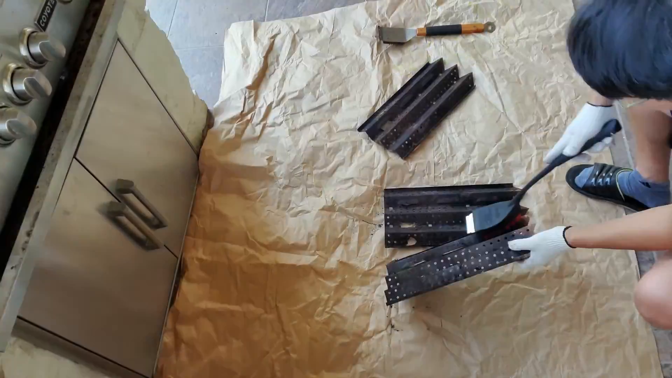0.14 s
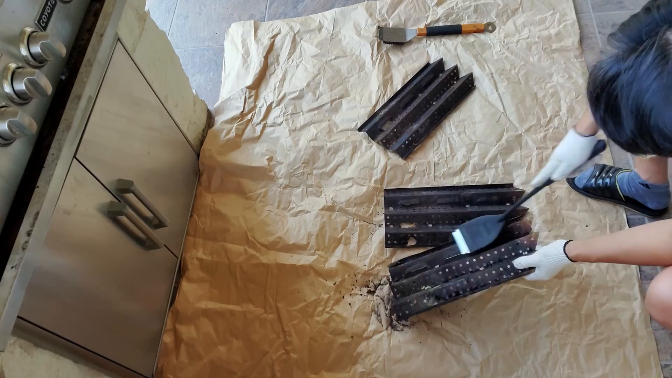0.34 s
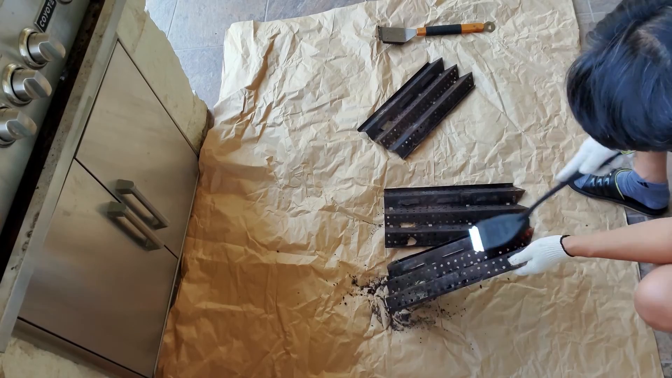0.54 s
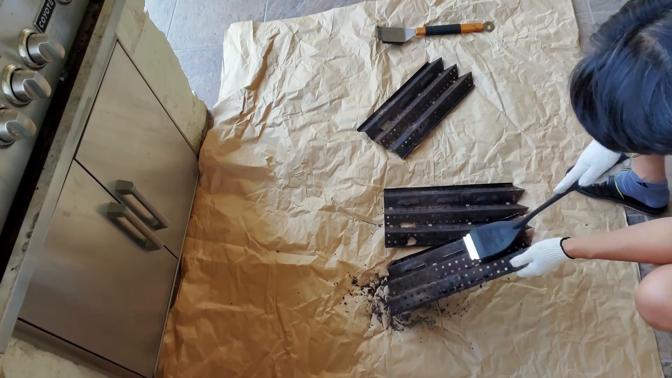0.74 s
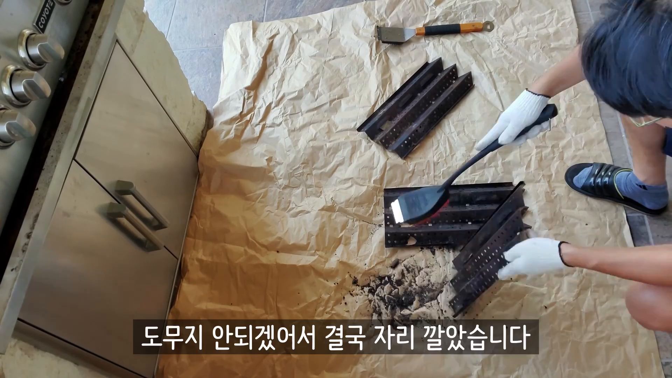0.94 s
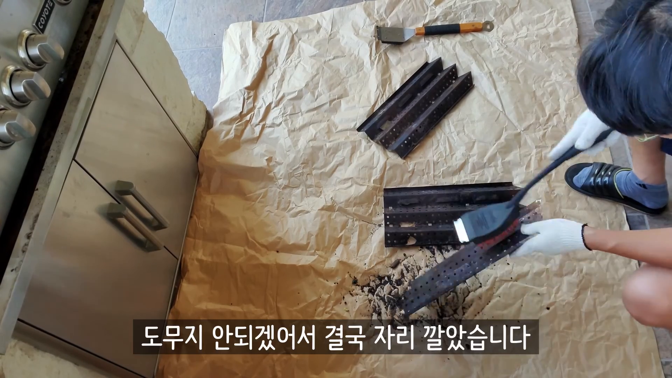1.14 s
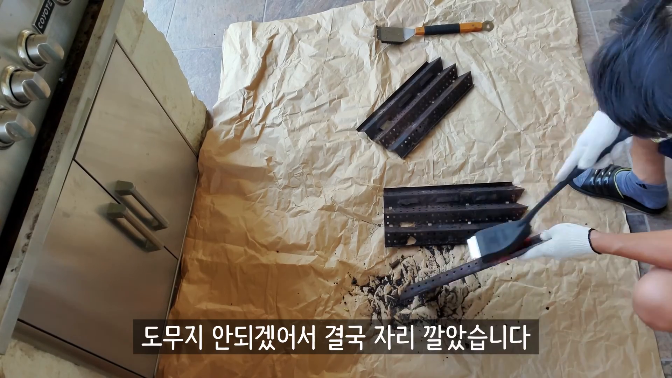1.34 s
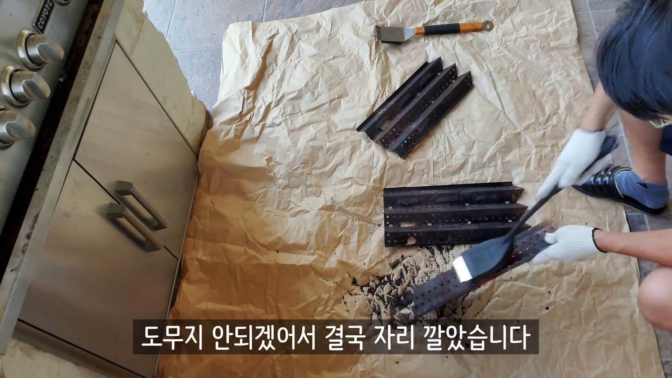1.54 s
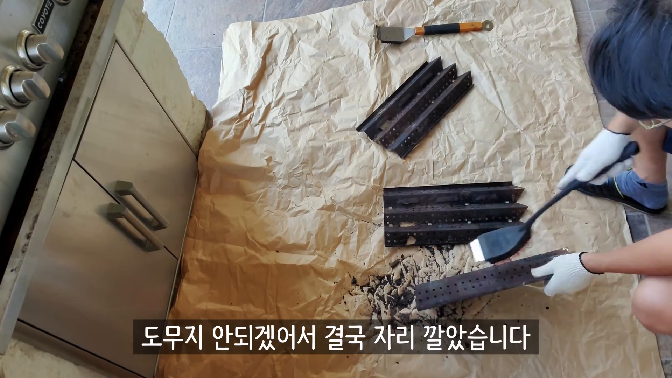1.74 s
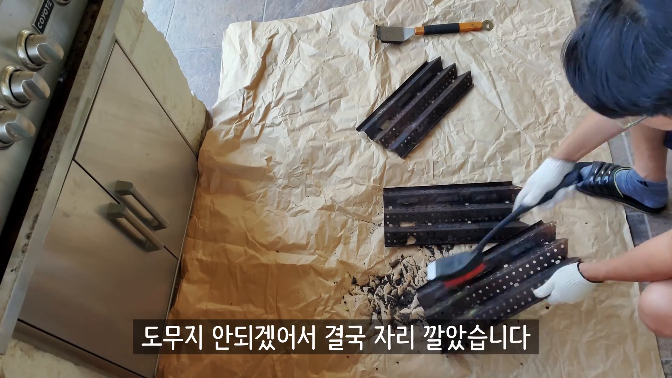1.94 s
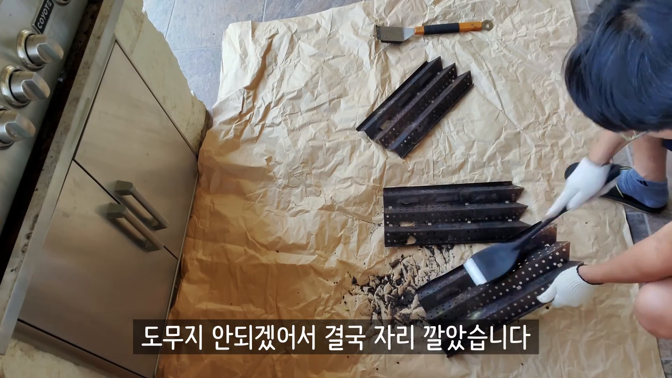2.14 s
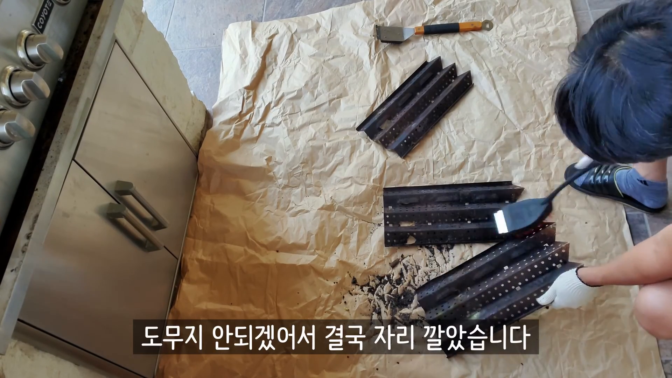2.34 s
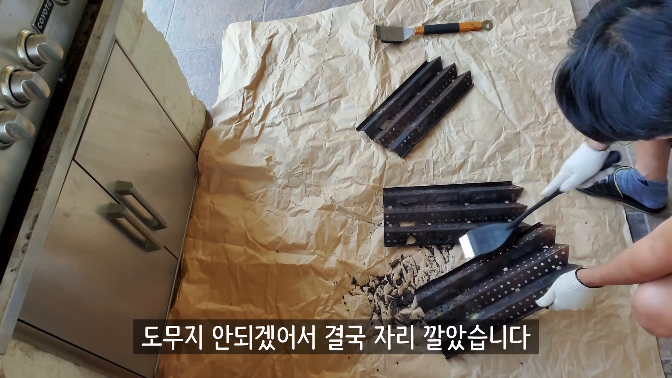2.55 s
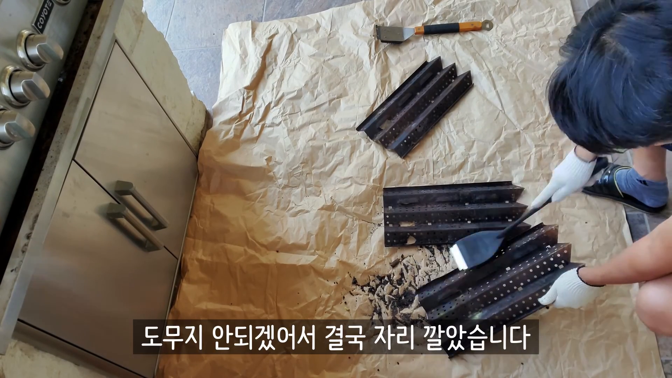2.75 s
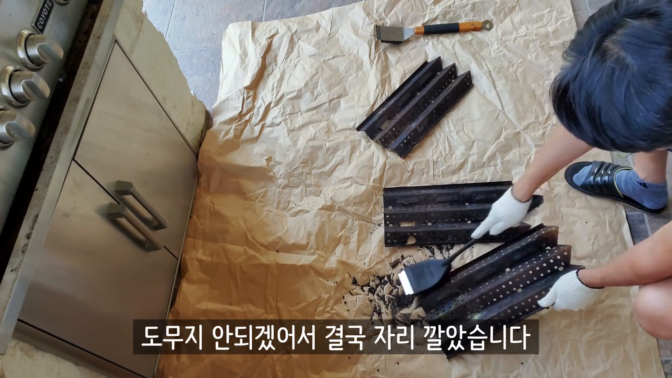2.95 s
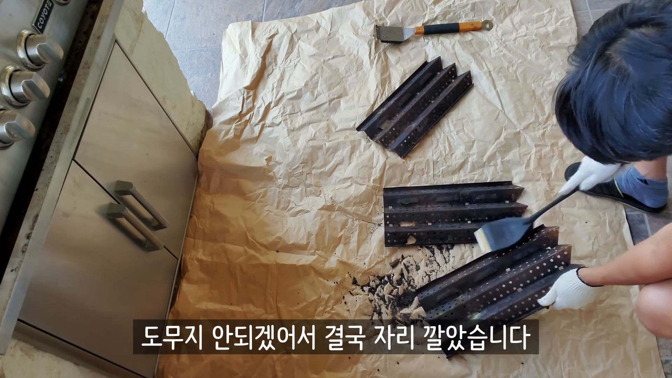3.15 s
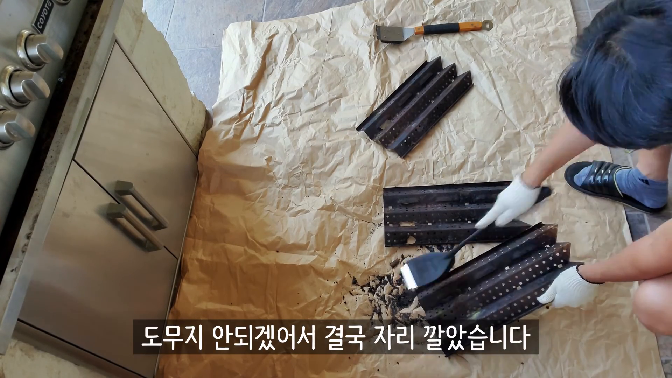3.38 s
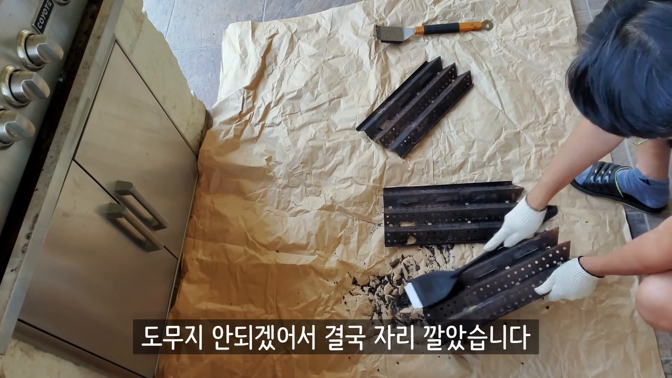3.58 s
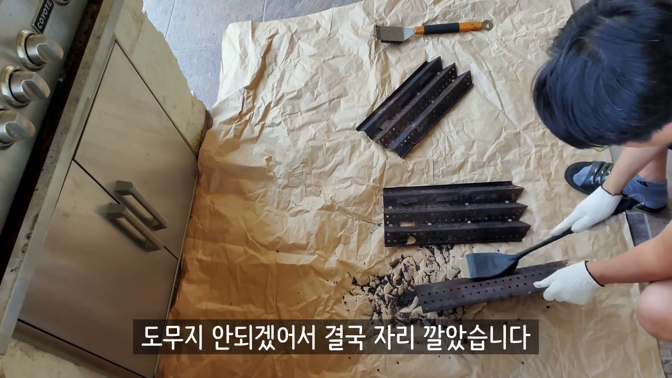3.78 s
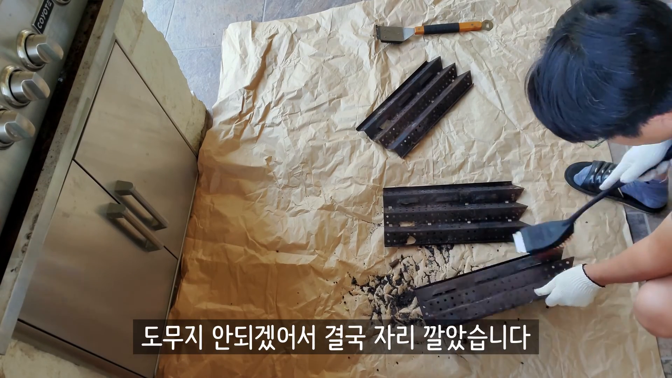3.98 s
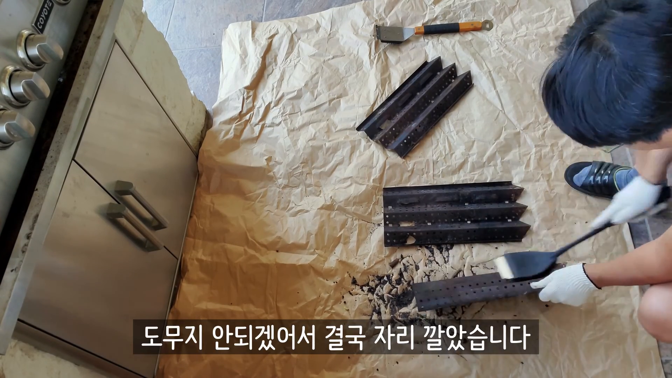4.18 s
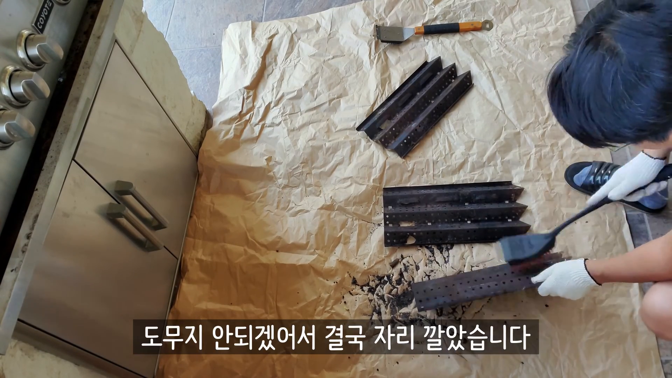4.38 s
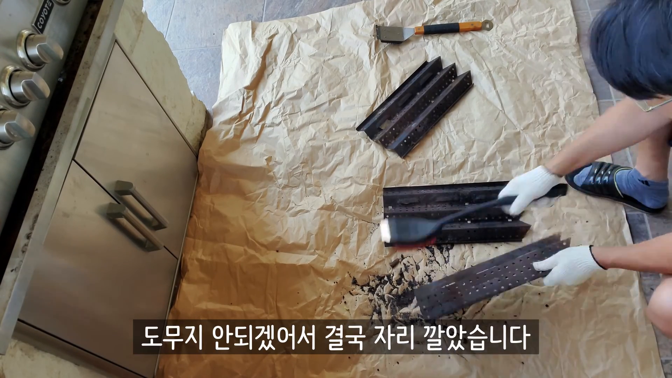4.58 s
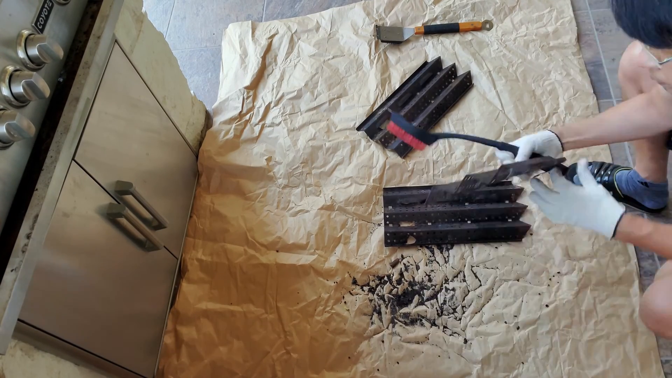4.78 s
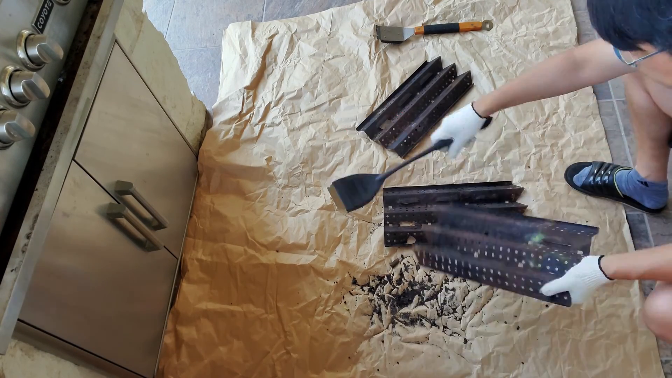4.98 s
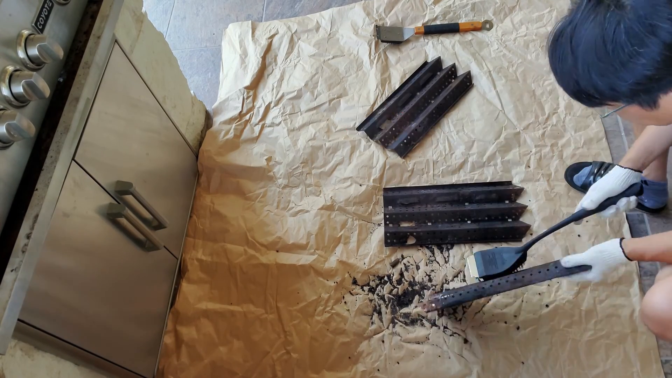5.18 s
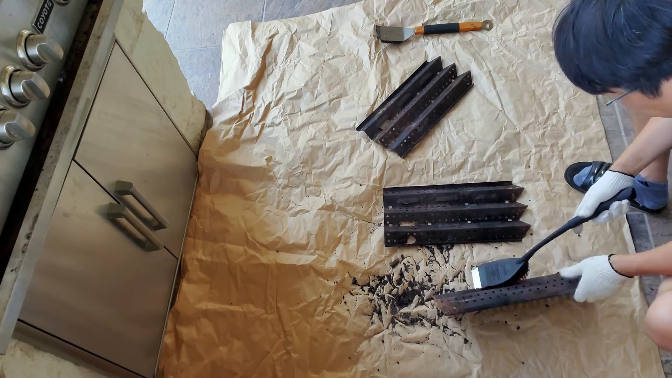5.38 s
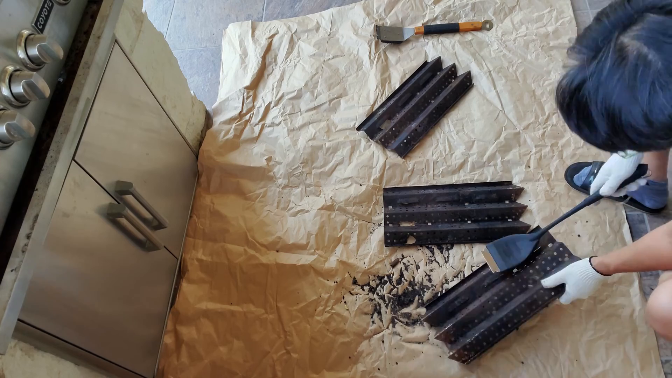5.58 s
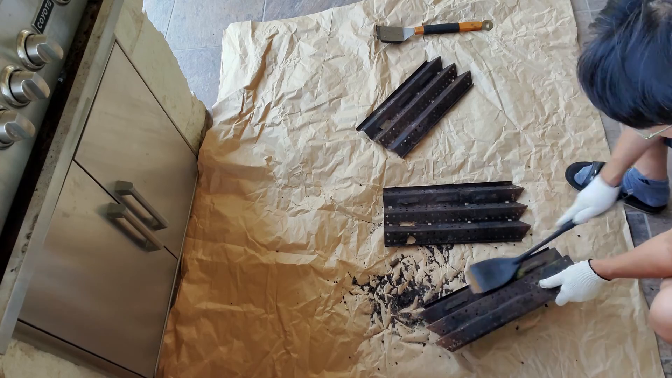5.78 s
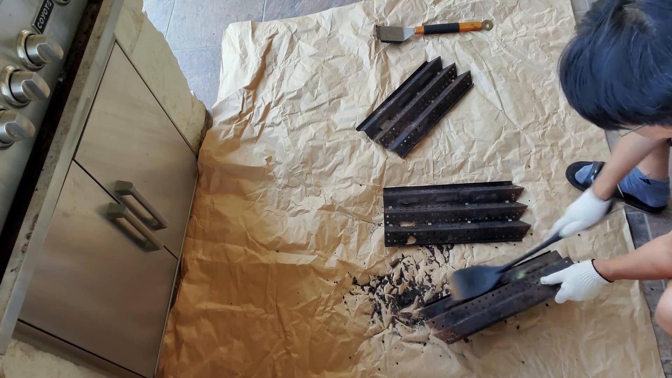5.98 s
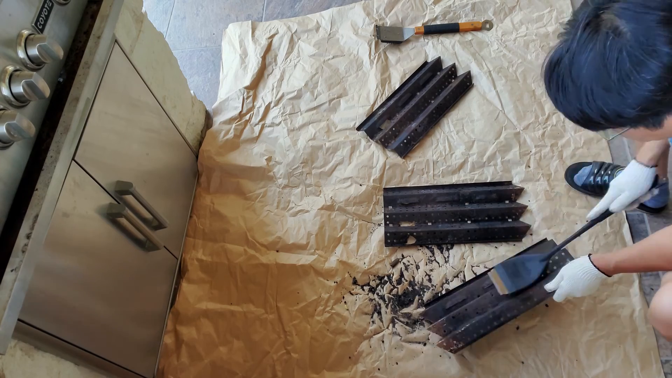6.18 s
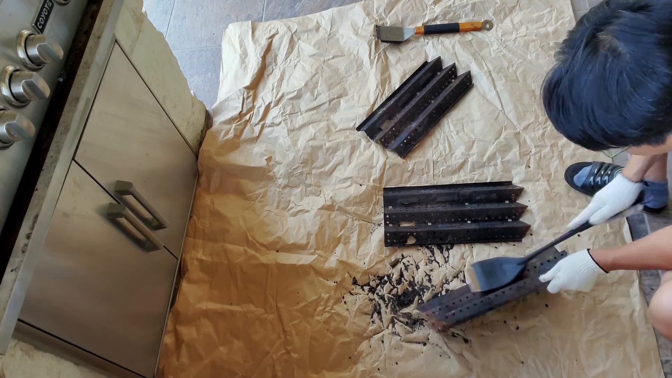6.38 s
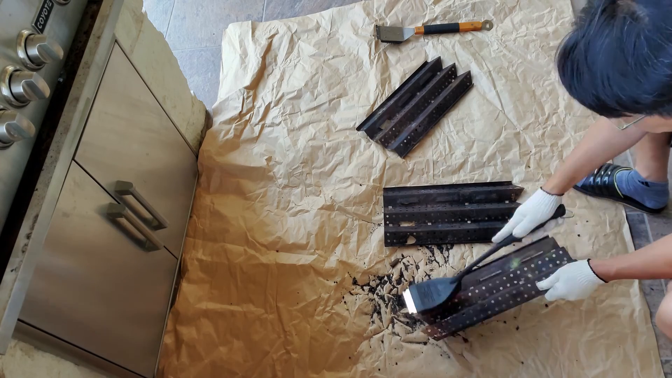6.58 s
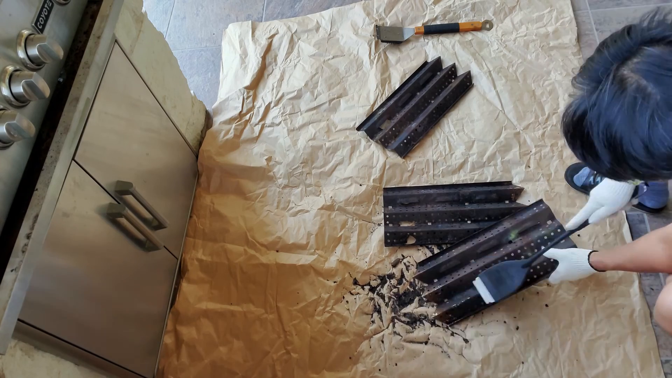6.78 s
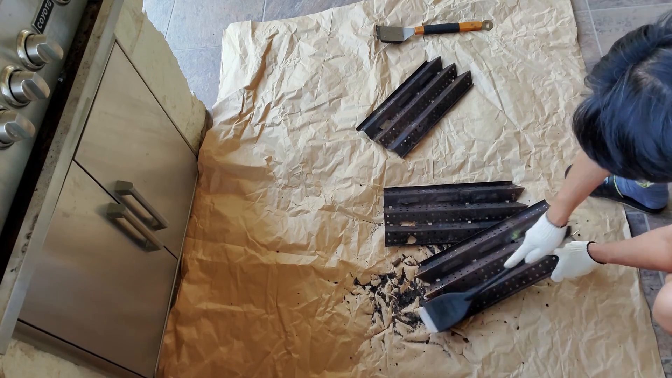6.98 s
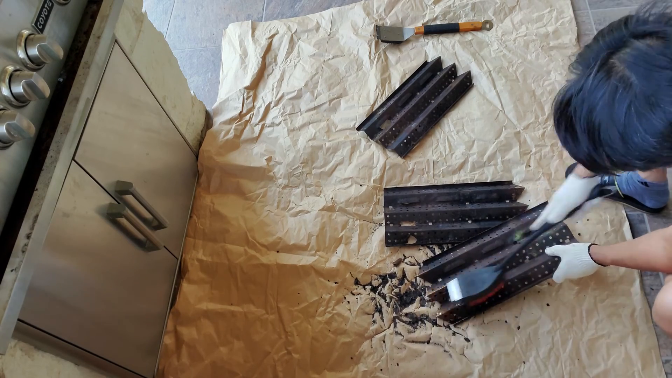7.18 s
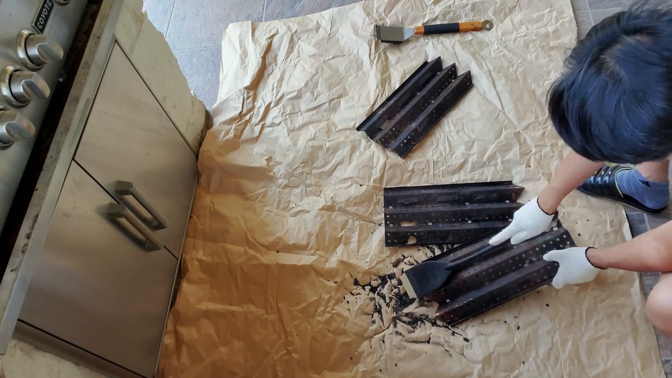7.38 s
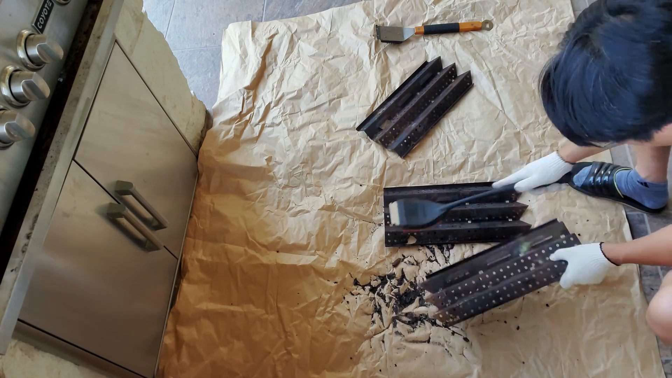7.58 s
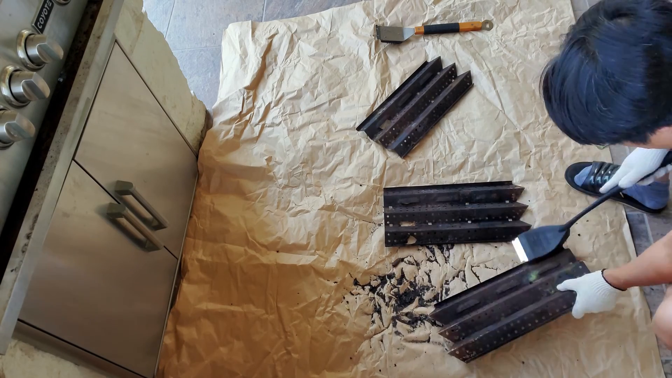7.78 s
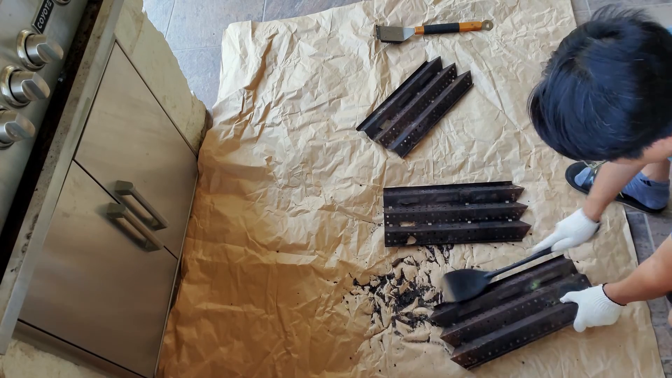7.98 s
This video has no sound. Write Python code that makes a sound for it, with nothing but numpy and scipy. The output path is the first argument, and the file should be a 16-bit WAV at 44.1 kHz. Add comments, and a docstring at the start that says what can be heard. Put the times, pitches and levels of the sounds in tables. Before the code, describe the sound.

Stiff bristles scratch quickly across hand-held sheet metal, gritty and bright with a hollow tinny body beneath. Bursts of several strokes a second alternate with brief pauses, where the plate clacks on its neighbours or the ground, ringing only briefly, and drags over crumpled paper. The longest pause is just past the middle. Two close microphones outdoors catch a tight hard-surface reflection, soft distant rumble and faint hiss.

```python
"""On a patio, close to two microphones, a wire brush scrubs folded sheet-metal grill plates in quick strokes.
Dense clicks of bristle noise make the rasp and drive the low modes of the plate being held.
The plate knocks on its neighbours and the ground, ringing shortly, and scrapes over crumpled paper when turned.
A short echo follows it all, and noise makes a low outdoor rumble, unrelated in the two microphones."""
import sys
import numpy as np
from scipy import signal
from scipy.io import wavfile
from scipy.ndimage import uniform_filter1d

SR = 44100
rng = np.random.default_rng(int(sys.argv[2]) if len(sys.argv) > 2 else 0)


def store_pcm(level_fs):
    """Save levels as 16-bit WAV."""
    pcm = np.round(np.clip(level_fs, -1, 1) * 32767).astype(np.int16)
    wavfile.write(sys.argv[1], SR, np.atleast_2d(pcm).T)


N = 354123

# Brush strokes on the plate. Each row: start in seconds, length in ms, bristle rasp in relative dB.
STROKES = [(.202, 101, -41), (.303, 120, -50), (0.393, 60, -40.5), (.56, 125, -43.5), (0.602, 74, -44),
           (0.684, 69, -43.5), (0.761, 80, -42.5), (1.208, 92, -47), (1.276, 64, -45.5), (1.355, 87, -43),
           (1.46, 61, -45), (1.535, 84, -42), (1.832, 84.4, -39.5), (2.031, 68, -39), (2.111, 77, -45.5),
           (2.197, 57, -41), (2.409, 46, -39.5), (2.445, 71, -43), (2.529, 57, -46.5), (2.603, 83, -37.5),
           (2.688, 59, -40), (2.764, 55, -36), (2.832, 48, -38.5), (2.891, 56, -37.5), (2.955, 55, -40.5),
           (3.02, 50.5, -37.5), (3.081, 119, -40.5), (3.261, 106, -38), (3.492, 84, -39),
           (3.598, 62, -42.5), (3.665, 71, -44), (3.745, 54, -44), (3.798, 65, -44.5), (3.869, 103, -42),
           (4.038, 110, -41.5), (4.147, 64, -41.5), (4.22, 79, -40.5), (4.302, 69, -43.5),
           (4.47, 78, -44.5), (5.637, 103, -43), (5.753, 57, -43.5), (5.816, 68, -42.5), (5.9, 62, -44),
           (5.963, 80.4, -41.5), (6.183, 85.5, -39), (6.386, 77, -42), (6.533, 49, -43), (6.806, 55, -38),
           (6.871, 61, -43.5), (6.935, 49, -38.5), (6.988, 66, -43.5), (7.065, 41, -38), (7.105, 71, -44.5),
           (7.184, 46.7, -36), (7.343, 67, -43.5), (7.415, 55, -44.5), (7.47, 59.3, -41.5),
           (7.793, 100, -49.5), (7.882, 100, -41), (7.972, 71, -45.5)]
# How hard the brush leans into the plate. Each row: time in seconds, push in dB over the rasp.
PRESSURE = [(0, 17), (.8, 8.5), (1.25, 10), (1.5, 5), (2.2, 9), (2.7, 6.5), (3.2, 8), (3.7, 11),
            (4.2, 12.5), (5.7, 12.5), (6.5, 11.5), (6.8, 3), (7.15, 11.5)]
# Spectrum of the wire tips. Each row: frequency in Hz, level in relative dB.
BRISTLES = [(600, -21), (900, -15), (1250, 2), (2040, 4), (3200, 2.5), (4810, 2.5), (5900, 5), (7390, 2.5),
            (8310, -3.5), (11100, 1.5), (15800, -4)]
# Modes of the plate, also rung by the knocks. Each row: frequency in Hz, level in relative dB,
# time to fall 60 dB in seconds when it rings freely.
PLATE = [(360, -8, .04), (530, -8, .04), (748, -3, .055), (967, -6, .08), (1093, -1, .12), (1408, -3, .06),
         (1490, -6, .03), (1630, -2, .08), (1825, -2, .06), (1945, -3, .045), (2090, -4, .05),
         (2250, -4, .03), (2395, -1, .05), (2680, -3, .05), (2925, -3, .04), (3130, -3, .04),
         (3820, -3, .04)]
# Spectrum of the plate thudding on the ground, also in the knocks. Each row: frequency in Hz, relative dB.
THUD = [(130, -70), (230, 5), (310, 4.5), (480, 1), (800, 5.5), (1400, -59)]
SPEED_UP, SPEED_UP_MS = .2, 14  # a stroke gains speed over this share of its length plus a fixed time
LEAN = 0.54  # dB gained by the lower rasp for each dB of pressure
ROCK_DB = -45.5  # the plate rocking on the ground, against the push of the brush


def brush():
    """Wire tips catch and let go; pressure deepens the rasp, drives the plate's low modes and rocks it."""
    strokes = np.array(STROKES)
    rows, rasp_db = spans(strokes, SPEED_UP, SPEED_UP_MS), strokes[:, 2]
    pressure_db = np.interp(rows[:, 0], *np.transpose(PRESSURE))
    push_db = rasp_db + pressure_db

    tips = coloured(clicks(10000, spread_db=1.5), BRISTLES, patchy_db=5.0, size=512)
    low = signal.filtfilt(*signal.butter(2, 2300, fs=SR), tips)
    lean_db = LEAN * (pressure_db - 10)
    out = humps(rows, rasp_db + 1.67, squareness=3.24) * (tips - low)
    out += humps(rows, rasp_db + lean_db, squareness=2.2) * low

    push = clicks(8000, spread_db=5.5)
    # random mode levels vary the colour of each stroke
    vary_db = 6.5 * rng.standard_normal((len(rows), len(PLATE)))
    for k, (hz, db, t60) in enumerate(PLATE):
        drive = humps(rows, push_db + db + vary_db[:, k] - 44.5) * push
        out = out + mode(drive, hz, t60)

    rocking = coloured(clicks(400, spread_db=3.), THUD, patchy_db=4., size=512)
    return out + humps(rows, push_db + ROCK_DB) * rocking


def mode(x, hz, t60):
    """One mode of the plate: a two-pole resonator passing white noise at unchanged power."""
    r = 10 ** (-3 / (t60 * SR))
    w = 2 * np.pi * hz / SR
    return signal.lfilter([np.sin(w) * np.sqrt(2 * (1 - r * r))], [1, -2 * r * np.cos(w), r * r], x)


# Knocks of the held plate. Each row: peak time in seconds, fall by 10 dB in ms, tick in relative dB,
# ring in relative dB, two favoured pitches in Hz, and how freely it rings from 0 to 1.
KNOCKS = [(0.564, 7.6, -69, -57.5, 748, 530, 0.1), (0.914, 13.4, -39.5, -38.5, 1770, 2550, 0.21),
          (0.986, 41, -49.5, -45.5, 530, 336, 0.57), (1.042, 22, -53, -52.5, 530, 1960, 0.08),
          (1.143, 4.3, -48, -60, 2060, 2900, 0.4), (1.173, 20, -53.5, -53, 1960, 350, 0.19),
          (1.739, 7.9, -59, -53, 2395, 2280, 0.26), (2.353, 34, -54.5, -59.5, 800, 1440, 0.25),
          (4.199, 110, -74, -60.5, 360, 530, 0.12), (4.458, 7.7, -50, -50.5, 2300, 1400, 0.7),
          (4.751, 14.6, -51, -51, 967, 2020, 0.7), (4.835, 6.3, -71, -50.5, 1460, 1480, 0.46),
          (4.852, 6.3, -55.5, -49.5, 2090, 1945, 0.24), (4.92, 14, -58.5, -57, 1630, 1650, 0.34),
          (5.051, 6.1, -54, -56.5, 3100, 1940, 0.35), (5.077, 6.2, -74, -61, 1945, 1945, 0.3),
          (5.316, 7.1, -60.5, -60.5, 748, 748, 0.6), (5.449, 5.9, -41, -53, 3820, 2080, 0.12),
          (5.501, 12.4, -56, -37.5, 1630, 2680, 0.39), (5.509, 16, -72, -43, 748, 1093, 0.68),
          (6.174, 11, -62, -42, 2430, 1093, 0.36), (6.284, 10, -60, -49, 1390, 967, 0.26),
          (6.375, 32, -49.5, -45.5, 2570, 1310, 0.28), (6.487, 16, -45.5, -41, 1945, 2925, 0.2),
          (6.509, 18, -44.5, -50, 990, 1380, 0.1), (6.653, 13, -55, -41, 3860, 1490, 0.34),
          (6.66, 26.4, -57.5, -39.5, 1420, 1770, 0.75), (6.715, 8, -44, -44.5, 2300, 1380, 0.35),
          (7.639, 16, -66, -45.5, 1415, 2580, 0.14), (7.713, 13, -51.5, -61, 2660, 1900, 0.4)]
# Spectrum of the bright tick. Each row: frequency in Hz, level in relative dB.
TICK = [(2000, -24), (3800, -8.5), (8000, -14), (15800, -20.5)]
# Spectrum of the clack below it. Each row: frequency in Hz, level in relative dB.
CLACK = [(500, -21), (1100, 4.5), (2600, -0.5), (3500, -5.5), (5500, -53)]
THUD_DB = -13  # thud against ring


def knocks():
    """Each knock is a short smeared burst: a bright tick, a clack, a low thud and ringing modes."""
    s, fall_ms, tick_db, ring_db = np.transpose(KNOCKS)[:4]
    rows = np.c_[s, 5.5 + .2 * fall_ms, fall_ms]  # a long knock also builds up more slowly
    tick = humps(rows, tick_db) * coloured(clicks(6000, spread_db=2.5), TICK, patchy_db=3.)
    thud = humps(rows, ring_db + THUD_DB) * coloured(clicks(3000, spread_db=2.5), THUD, patchy_db=2.5)
    clack = humps(rows, ring_db - 3.5) * coloured(clicks(3000, spread_db=3.), CLACK, patchy_db=3.)
    out = tick + thud + clack
    for row, knock in zip(rows, KNOCKS):
        at, sound = ring(*row, *knock[3:])
        out[:, at:at + sound.shape[1]] += sound
    return out


RING_DB, VARY_DB = 7.5, 2.5  # strength of the modes in a knock, and how much their levels vary at random
DETUNE = .025  # a plate gripped or lying on the ground shifts its modes by up to this share
LEAD = 2000  # samples computed before the peak of a knock


def ring(s, rise_ms, fall_ms, ring_db, hz_a, hz_b, free):
    """Modes near two favoured pitches swing up and die; a damped plate rings shorter, rougher, off pitch."""
    t = np.arange(-LEAD, 10000) / SR
    free = np.clip(free, .05, 1)
    side_ms = np.where(t < 0, rise_ms, max(fall_ms, 2))
    blow = 10 ** (-(1000 * t / side_ms) ** 2 / 2)
    out = 0
    for (hz, db, t60), (vary, shift, turn) in zip(PLATE, rng.uniform(-0.87, 1, (len(PLATE), 3))):
        octaves = min(abs(np.log2(hz / hz_a)), abs(np.log2(hz / hz_b)))
        off_db = -min(900 * octaves ** 2, 13 + 6 * octaves) + VARY_DB * vary
        r = 10 ** (-3 / (t60 * free * SR))
        roughness = (rng.standard_normal((len(t), 2)) @ [1, 1j]) / np.sqrt(1 - r)
        force = blow * (np.sqrt(free) + (1 - free) ** 2 * roughness)
        swing = signal.lfilter([1 - r], [1, -r], force)
        # each mode is a quarter cycle apart in left and right, which keeps the ring wide and its level steady
        shifted_hz = hz * (1 + DETUNE * (1 - free) * shift)
        cycles = shifted_hz * t + turn + np.array([[0], [.25]])
        out = out + gain_of(ring_db + db + off_db + RING_DB) * (swing * np.exp(2j * np.pi * cycles)).real
    return round(s * SR) - LEAD, out


# Short drags over paper and grit. Each row: start in seconds, length in ms, level in relative dB.
DRAGS = [(0.132, 32, -49.5), (0.401, 110, -54), (.712, 12, -53.5), (1.76, 69, -56), (1.962, 93, -59),
         (3.446, 23, -52), (4.36, 100, -57.5), (4.54, 67, -59.5), (5.605, 29, -59), (6.144, 30, -55.5),
         (6.675, 39, -60), (6.762, 41, -54), (7.297, 36, -57.5), (7.728, 55, -55)]
# Paper rustling while the plate is shifted and turned over, one list for each of the two moves.
# Each row: time in seconds, level in relative dB.
TURNS = [
    [(.76, -63), (.91, -56.5), (1.15, -60.5), (1.68, -60.5), (1.76, -61)],
    [(4.8, -76), (4.94, -61), (5.02, -74), (5.07, -57.5), (5.16, -63.5), (5.22, -57.5), (5.3, -70.5),
     (5.35, -58.5), (5.44, -59), (5.51, -46), (5.56, -79)],
]
# Spectrum of the paper. Each row: frequency in Hz, level in relative dB.
PAPER = [(400, -16), (1000, -8), (2000, 1.5), (4500, -3), (8000, -8.5), (15800, -11.5)]
DRAG_RISE = 0.41  # share of a drag spent swelling


def drags():
    """Crumpled paper and grit hiss and crackle under the moving plate, as dense uneven clicks."""
    rows, t = np.array(DRAGS), np.arange(N) / SR
    level = humps(spans(rows, DRAG_RISE), rows[:, 2])
    for turn in TURNS:
        turn_db = np.interp(t, *np.transpose(turn), left=-120, right=-120)
        level = np.hypot(level, gain_of(turn_db))
    return level * coloured(clicks(6000, spread_db=2.), PAPER, patchy_db=5., size=512)


DULL_HZ = 6500  # the echo loses its treble above this


def patio(x):
    """Hard ground and cabinet doors return a short, thin wash: sparse random reflections dying away."""
    t = np.arange(SR // 4) / SR
    signs = rng.choice([-1., 1.], (2, len(t)))
    present = rng.random((2, len(t))) < .05
    tail = signs * present * gain_of(-60 * t / 0.13)  # falls 60 dB in 0.13 s
    tail = signal.lfilter(*signal.butter(1, DULL_HZ, fs=SR), tail)
    tail = tail / np.linalg.norm(tail, axis=1, keepdims=True)
    return signal.oaconvolve(x, tail, axes=1)[:, :N]


# Spectrum of the outdoor air. Each row: frequency in Hz, level in relative dB.
AIR = [(15, -38), (25, 2.5), (60, -1.5), (130, -4.5), (210, -18), (700, -19), (2000, -18), (5000, -23),
       (15800, -27.5)]
# Slow level of the distant rumble. Each row: time in seconds, gain in dB.
RUMBLE = [(0.0, -62.5), (1.92, -63.5), (3.5, -66.5), (8.03, -65)]
HISS_DB = -63  # gain of the air noise above the rumble


def air():
    """Distant outdoor rumble that sinks slowly and recovers a little, and faint steady hiss: coloured noise."""
    noise = coloured(rng.standard_normal((2, N)), AIR, patchy_db=4.5, size=2048)
    low = signal.filtfilt(*signal.butter(2, 200, fs=SR), noise)
    rumble_db = np.interp(np.arange(N) / SR, *np.transpose(RUMBLE))
    return gain_of(rumble_db) * low + gain_of(HISS_DB) * (noise - low)


def gain_of(db):
    """Decibels to amplitude."""
    return 10 ** (np.asarray(db) / 20)


def evened(x):
    """Scales to rms 1."""
    return x / np.sqrt(np.mean(x ** 2) + 1e-20)


def spans(rows, rise, rise_ms=0):
    """From start and length to peak time in seconds, rise in ms and fall in ms."""
    s, ms = rows[:, 0], rows[:, 1]
    up_ms = rise * ms + rise_ms
    return np.c_[s + up_ms / 1000, up_ms, ms - up_ms]


HOP = 32  # samples between computed points of a level curve


def humps(rows, db, squareness=2):
    """Amplitude of events that swell and fade, 10 dB below their peak one rise before and one fall after."""
    t = np.arange(N // HOP + 2) * HOP / SR
    late_ms = 1000 * (t - rows[:, :1])
    side_ms = np.where(late_ms < 0, rows[:, 1:2], rows[:, 2:3])
    distance = abs(late_ms) / np.maximum(side_ms, 2)
    power = gain_of(db) ** 2 @ 10 ** -np.minimum(distance ** squareness, 12)
    return np.interp(np.arange(N) / SR, t, np.sqrt(power))


def clicks(per_s, spread_db):
    """Random clicks of either sign and uneven size, a different train for each microphone."""
    hit = rng.random((2, N)) < per_s / SR
    size = rng.exponential(1, (2, N))
    sign = rng.standard_normal((2, N))
    return evened(hit * gain_of(spread_db * np.minimum(size, 4)) * sign)


def coloured(x, points, patchy_db, size=256):
    """Gives x a spectrum, with patches that drift over time and pitch, weaker in the treble."""
    hz, t, z = signal.stft(x, SR, nperseg=size)
    f, db = np.transpose(points)
    patches = rng.standard_normal(z.shape[1:])  # shared by both microphones
    patches = uniform_filter1d(patches, size=2, axis=0)
    patches = evened(uniform_filter1d(patches, size=10, axis=1))
    spectrum_db = np.interp(np.log(hz + 1), np.log(f), db)[:, None]
    z = z * gain_of(spectrum_db + patchy_db * patches / (1 + hz[:, None] / 9000))
    return evened(signal.istft(z, SR, nperseg=size)[1][:, :N])


def scene():
    """Brush and plate slightly left, their echo, and the air."""
    near = (brush() + knocks() + drags()) * gain_of([[2.3], [1.7]])  # left, right in dB
    echo = gain_of(-9) * patio(near)
    return near + echo + air()


EDGE_HZ = 15780  # top of the band


def record(dry):
    """A steep low-pass filter limits the band."""
    lowpass = signal.firwin(1023, EDGE_HZ, window=("kaiser", 9), fs=SR)
    return signal.oaconvolve(dry, lowpass[None], "same")


dry = scene()
out = record(dry)
store_pcm(out)
```